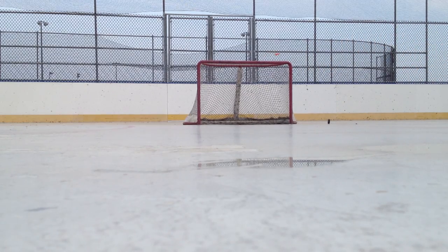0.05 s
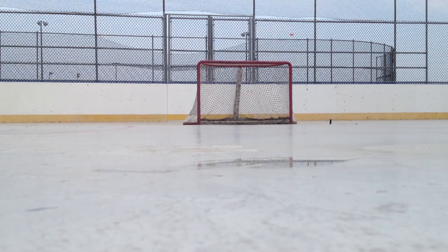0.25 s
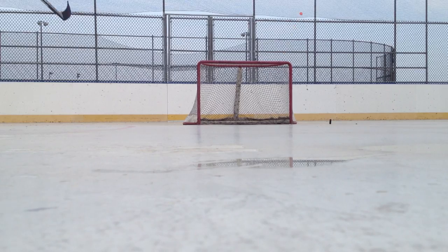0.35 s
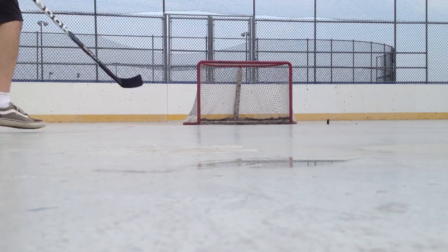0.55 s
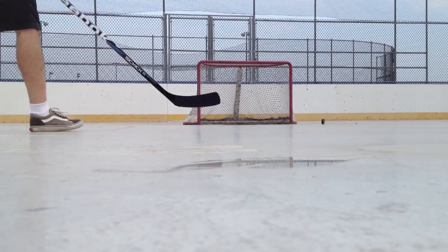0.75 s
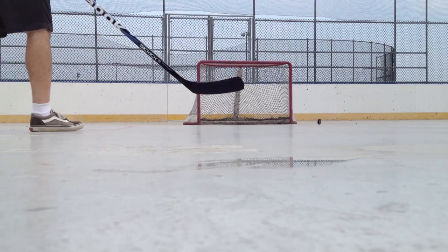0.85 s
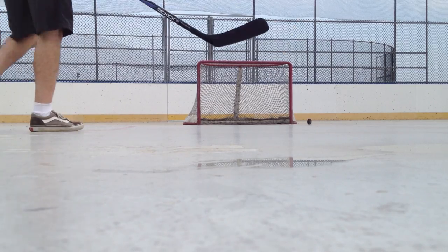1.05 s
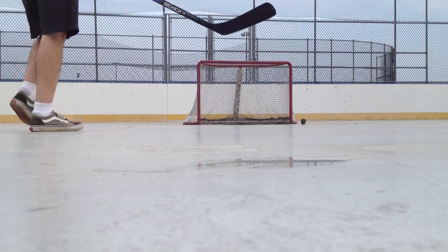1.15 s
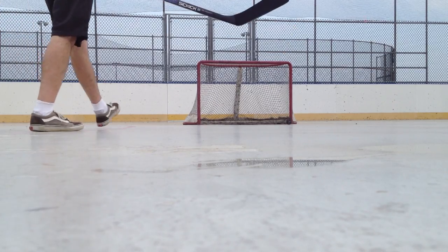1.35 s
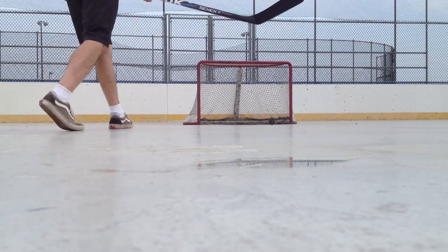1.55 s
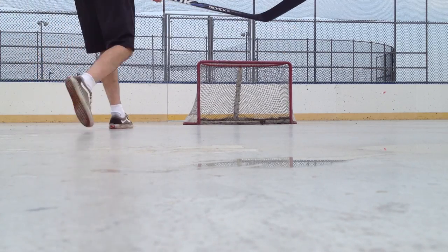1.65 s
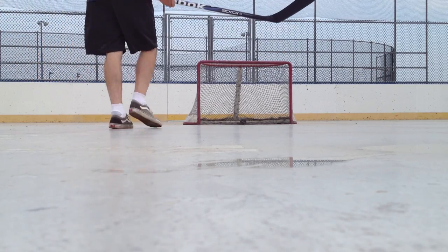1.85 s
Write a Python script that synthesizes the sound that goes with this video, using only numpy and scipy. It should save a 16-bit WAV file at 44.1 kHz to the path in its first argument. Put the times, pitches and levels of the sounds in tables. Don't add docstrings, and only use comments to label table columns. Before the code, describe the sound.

One loud, sharp metal clank as a puck strikes a hockey goal frame, ringing and rattling briefly, with echoes off boards and far walls; faint traffic hum, then a gritty shoe crunch near the microphone at the end.

```python
import sys
import numpy as np
from scipy import signal
from scipy.fft import rfft, irfft, next_fast_len
from scipy.io import wavfile
from scipy.ndimage import uniform_filter1d, map_coordinates

SR = 44100
rng = np.random.default_rng(int(sys.argv[2]) if len(sys.argv) > 2 else 0)


def attenuation_scalar(level_db):
    decades = np.asarray(level_db, float) / 20
    return 10 ** decades


def digitize_waveform(pressure):
    field = np.atleast_2d(pressure).T
    bounded = np.clip(field, -1, 1)
    quanta = np.round(bounded * 32767).astype(np.int16)
    wavfile.write(sys.argv[1], SR, quanta)


N = 83790


def unit(x):
    return x / np.sqrt(np.mean(x ** 2) + 1e-20)


def along(points, hz):
    f, v = np.transpose(points)
    return np.interp(np.log(hz + 1), np.log(f + 1), v)


def filtered(x, response):
    m = next_fast_len(len(x) + SR // 4)
    return irfft(rfft(x, m) * response(np.fft.rfftfreq(m, 1 / SR)), m)[:len(x)]


def add(track, s, x):
    part = track[max(round(s * SR), 0):][:len(x)]
    part += x[:len(part)]


def wobble(rate_hz):
    knots = rng.standard_normal(int(N * rate_hz / SR) + 4)
    return map_coordinates(knots, [np.arange(N) * rate_hz / SR])


def air():
    # frequency in Hz, level in dB.
    hum_spectrum = [(40, -44.5), (70, -20.5), (180, 1), (440, -10), (1050, -9.5), (1600, -17),
                    (3100, -31.5), (6000, -48.5)]
    # frequency in Hz, level in dB.
    hiss_spectrum = [(3000, 1), (6500, -2.5), (7400, -3.5), (7950, 7.5), (8700, -1), (9500, -26),
                     (11000, -12), (14500, -5)]
    hum_db, hiss_db = -52.5, -68
    z = signal.stft(rng.standard_normal(N + 512), nperseg=512)[2]
    field = uniform_filter1d(rng.standard_normal(z.shape), 5, 0)
    field = uniform_filter1d(field, 12, 1)
    patchy = signal.istft(z * attenuation_scalar(2.2 * unit(field)), nperseg=512)[1][:N]
    hum = unit(filtered(patchy, lambda hz: attenuation_scalar(along(hum_spectrum, hz))))
    noise = rng.standard_normal(N)
    hiss = unit(filtered(noise, lambda hz: attenuation_scalar(along(hiss_spectrum, hz)) * (hz > 1500)))
    return attenuation_scalar(hum_db + .6 * wobble(3.5)) * hum + attenuation_scalar(hiss_db) * hiss


def bird():
    # start in seconds, length in seconds, from pitch in Hz, to pitch in Hz, level in dB.
    whistles = [
        (.0, .03, 3500, 3800, -73),
        (.04, .025, 4800, 4600, -72),
        (.072, .035, 3700, 4800, -73),
        (.11, .03, 3800, 4700, -73),
        (.122, .04, 4100, 4050, -74),
        (.125, .045, 3300, 4750, -73),
        (.95, .06, 4500, 4800, -79),
        (1.55, .26, 4900, 4900, -80),
    ]
    out = np.zeros(N)
    for s, long_s, from_hz, to_hz, db in whistles:
        u = np.linspace(0, 1, round(long_s * SR))
        hz = from_hz + (to_hz - from_hz) * np.sin(u * np.pi / 2)
        envelope = np.sin(np.pi * u) ** .5 * attenuation_scalar(3 * wobble(120)[:len(u)])
        add(out, s, attenuation_scalar(db) * envelope * np.sin(2 * np.pi * np.cumsum(hz) / SR))
    return out


def goal():
    # start in seconds, level in dB.
    contacts = [
        (.2119, -28),
        (.2154, -20),
    ]
    # frequency in Hz, level in dB, t60 in seconds.
    tube = [(2182, -21, 1.1), (2204, -6, .2), (2222, -15, 1.1), (2236, -16, 1.05), (2255, 0, .5),
            (2290, -13, .6), (2355, -22, .8), (2457, -10, .2), (2543, -5, .38), (2606, -13, .25),
            (2697, 1, .4), (2251, -13, 1.1), (2938, -12, .22), (2250, 3, .06)]
    # frequency in Hz, level in dB,
    # t60 in seconds.
    frame_modes = [(750, -32, .12), (910, -32, .12), (965, -18, .25), (993, -10, .33), (1135, -21, .25),
                   (1266, -21, .2), (1750, -23, .15), (1921, -20, .18),
                   (3246, -23, .15), (3844, -13, .19), (4215, -17, .15), (4581, -16, .16), (4862, -17, .17),
             (5469, -21, .17), (2870, -16, .2), (5884, -13, .14), (6180, -16, .22), (6245, -8, .21),
             (6342, -4, .13), (6408, -5, .13), (6462, -11, .1), (7400, -17, .08)]
    # frequency in Hz, level in dB.
    rattle_spectrum = [(300, -23.5), (700, -20.5), (1000, -8.5), (1500, -10.5), (2700, -1), (4500, -3.5),
                       (5250, -8.5), (6500, 0), (9000, -14)]
    # frequency in Hz, gain in dB.
    rattle_top = [(9000, 3), (12000, 2.5), (15500, -2.5)]
    # frequency in Hz, t60 in seconds.
    rattle_t60 = [(300, .17), (1000, 0.37), (3000, 0.18), (4500, 0.17), (7000, 0.11), (14000, .08)]
    swell_s, crack_hz, crack_db, crack_t60_s, rattle_db = 0.001, 2600, 14.5, 0.00081, 7

    out, t = np.zeros(N), np.arange(SR * 3 // 2) / SR
    ring = np.zeros(len(t))
    for hz, db, t60 in tube:
        ring += attenuation_scalar(db - 60 * t / t60) * np.sin(2 * np.pi * hz * t)
    for hz, db, t60 in frame_modes:
        ring += attenuation_scalar(db - 60 * t / t60) * np.sin(2 * np.pi * (hz * t + rng.random()))
    ring *= 1 - np.exp(-t / swell_s)
    crack = attenuation_scalar(crack_db - 60 * t / crack_t60_s) * np.sin(2 * np.pi * crack_hz * t)
    for s, db in contacts:
        hz, u, z = signal.stft(rng.standard_normal(len(t)), SR, nperseg=128)
        start_db = along(rattle_spectrum, hz) + along(rattle_top, hz)
        shape_db = start_db[:, None] - 60 * u / along(rattle_t60, hz)[:, None]
        rattle = signal.istft(z * attenuation_scalar(shape_db), SR, nperseg=128)[1][:len(t)]
        add(out, s, attenuation_scalar(db) * (ring + crack + attenuation_scalar(rattle_db) * rattle))
    return out


def rink(x):
    # delay in seconds, level in dB, spread in seconds, dull above in Hz.
    echoes = [(.024, -7, 0.011, 8800), (.056, -8.5, 0.0045, 12000), (.112, -25, 0.0044, 8000),
              (.135, -16, 0.0027, 2230), (.17, -26.5, 0.11, 3500), (.232, -28, 0.017, 7000),
              (.275, -18, 0.064, 2870), (.335, -29.5, 0.021, 5120), (.38, -19, 0.041, 2750),
              (.45, -29.5, 0.036, 2500), (.53, -31.5, 0.22, 3000)]
    answer, t = np.zeros(SR * 2), np.arange(SR // 2) / SR
    for delay_s, db, spread_s, dull_hz in echoes:
        burst = rng.standard_normal(len(t)) * np.exp(-t / spread_s)
        burst /= np.linalg.norm(burst)
        burst = filtered(burst, lambda hz: 1 / (1 + 1j * hz / dull_hz) ** 2)
        add(answer, delay_s, attenuation_scalar(db) * burst)
    return signal.fftconvolve(x, answer)[:N]


def shoe():
    # start in seconds, peak in dB.
    ticks = [
        (0.6566, -67),
        (.669, -69),
        (0.68, -71),
        (.6855, -43.5),
        (.706, -74.5),
        (.752, -49),
    ]
    # start in seconds, peak in dB, pitch in Hz, t60 in seconds.
    grit = [(1.8111, -27, 1300, .005), (1.8122, -37, 1100, .012), (1.8153, -29, 2750, .009),
            (1.8184, -34, 2000, .007), (1.8229, -28, 4200, .012), (1.8262, -36, 2900, .02),
            (1.8457, -35, 2100, .006), (1.8499, -34, 4460, .007), (1.8605, -41, 1900, .015),
            (1.862, -38, 1000, .02), (1.8645, -39, 3300, .016), (1.8665, -36, 4300, .016),
            (1.875, -52, 4500, .02)]
    scuff_s, scuff_long_s, scuff_db = 1.811, .085, -58
    out, t = np.zeros(N), np.arange(SR // 25) / SR
    for s, db in ticks:
        add(out, s, attenuation_scalar(db - 60 * t / .003) * np.diff(rng.standard_normal(len(t) + 1)))
    for s, db, hz0, t60 in grit:
        kick = rng.standard_normal(len(t)) * attenuation_scalar(-60 * t / t60) * 0.377
        kick[0] = 3.05
        width_hz = .5 * hz0

        def resonance(f):
            band = 1j * f * width_hz
            return .1 + (band / (hz0 * hz0 - f * f + band)) ** 1.5

        snap = filtered(kick, resonance)
        add(out, s, attenuation_scalar(db) * snap / np.abs(snap).max())
    u = np.linspace(0, 1, round(scuff_long_s * SR))
    scuff_spectrum = [(600, -8), (3500, -7.5), (14000, -13)]  # (Hz, dB)
    scuff = unit(filtered(rng.standard_normal(len(u)), lambda f: attenuation_scalar(along(scuff_spectrum, f))))
    add(out, scuff_s, attenuation_scalar(scuff_db - 2.67 * u) * scuff * (1 - u ** 4))
    return out


def scene():
    # frequency in Hz, gain in dB.
    clank_tone = [(100, -26), (350, -3.5), (800, 2), (8000, -1.5), (9000, -11), (9900, -16), (11500, -7),
                  (15000, 1)]
    # frequency in Hz, gain in dB.
    sole = [(40, -38), (400, 6.5), (5000, 2), (6500, -1), (10000, -1.5), (13000, -8.5), (15000, -4)]
    background = air() + bird()
    clank = goal()
    strike = filtered(clank + rink(clank), lambda hz: attenuation_scalar(along(clank_tone, hz)))
    step = filtered(shoe(), lambda hz: attenuation_scalar(along(sole, hz)))
    return (background + strike + step)[None]


def top_cut(x):
    return signal.sosfilt(signal.butter(12, 16480, fs=SR, output="sos"), x)


def record(dry):
    top_hz = 15450
    mix = filtered(dry[0], lambda hz: hz < top_hz)[None]
    return top_cut(mix)


dry = scene()
out = record(dry)
digitize_waveform(out)
```